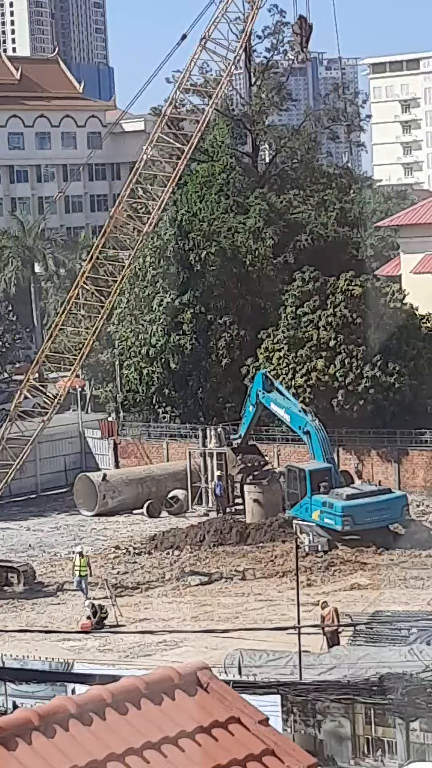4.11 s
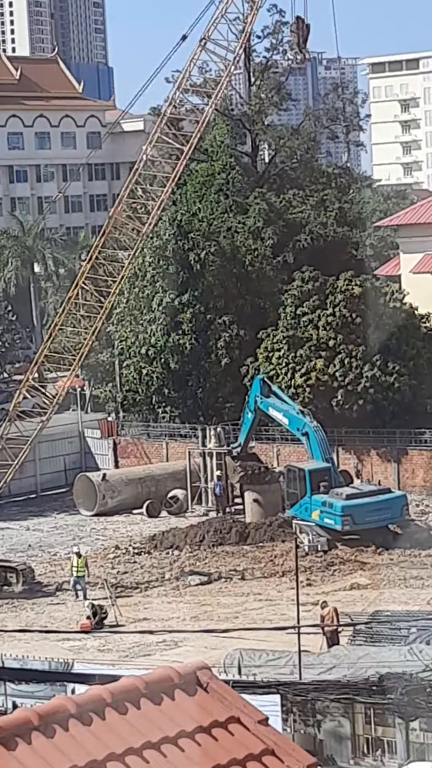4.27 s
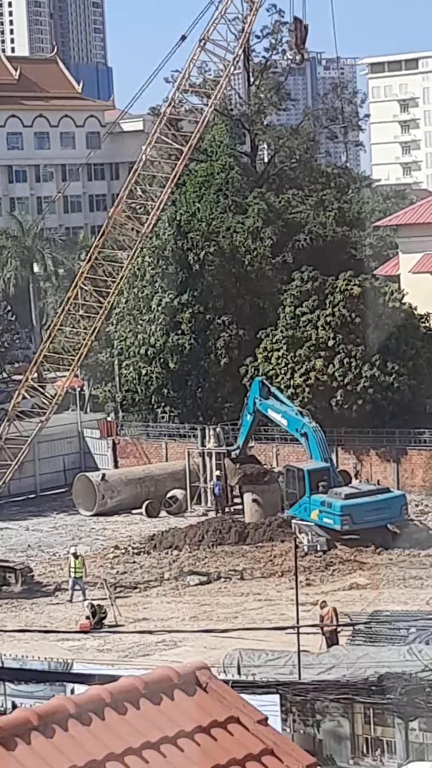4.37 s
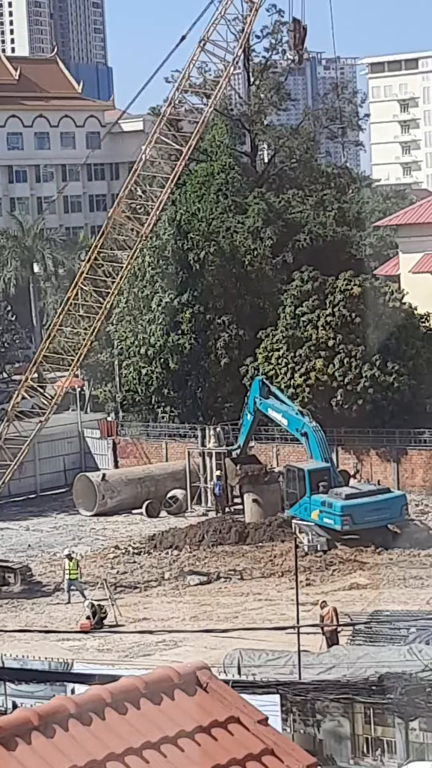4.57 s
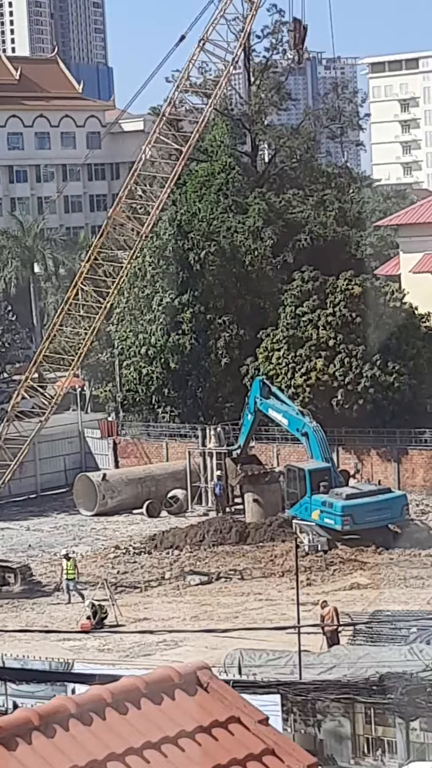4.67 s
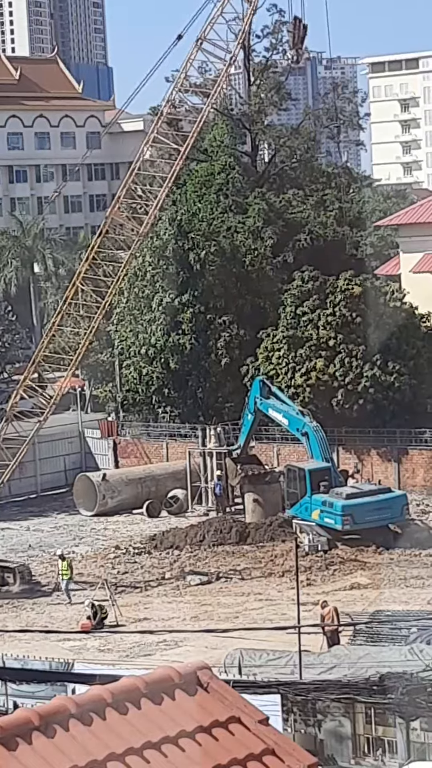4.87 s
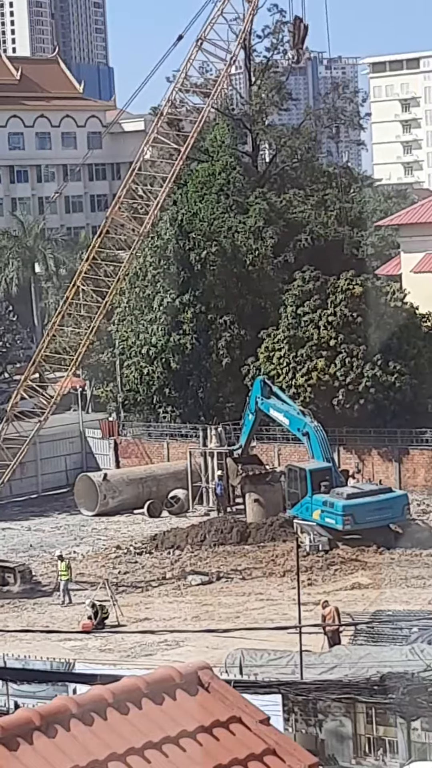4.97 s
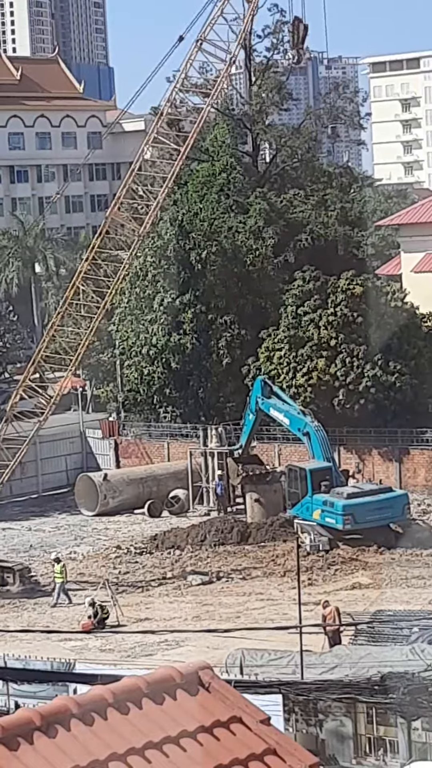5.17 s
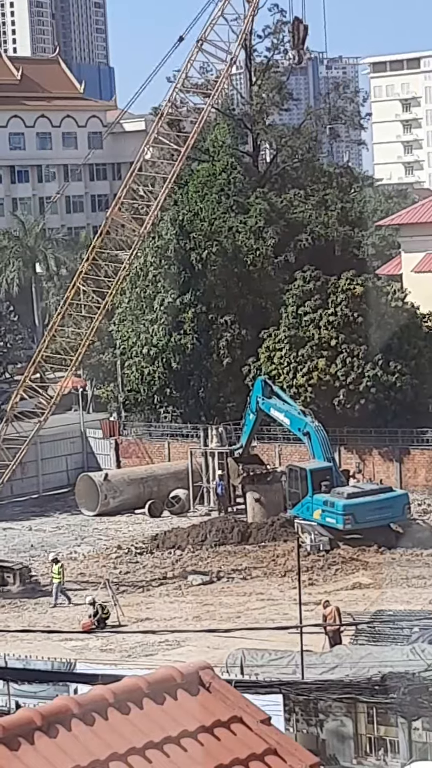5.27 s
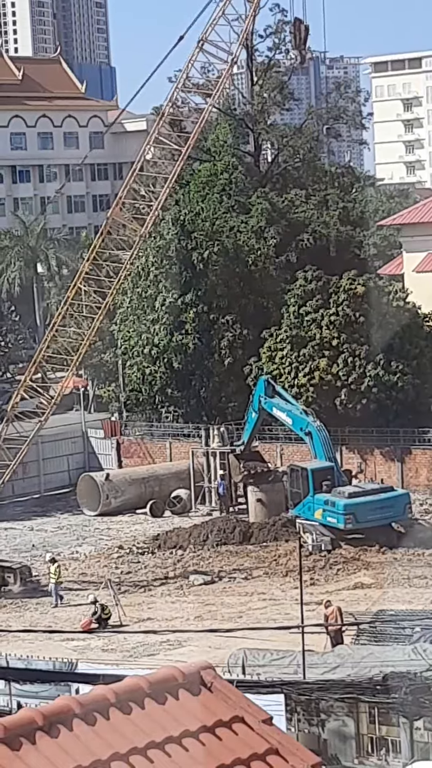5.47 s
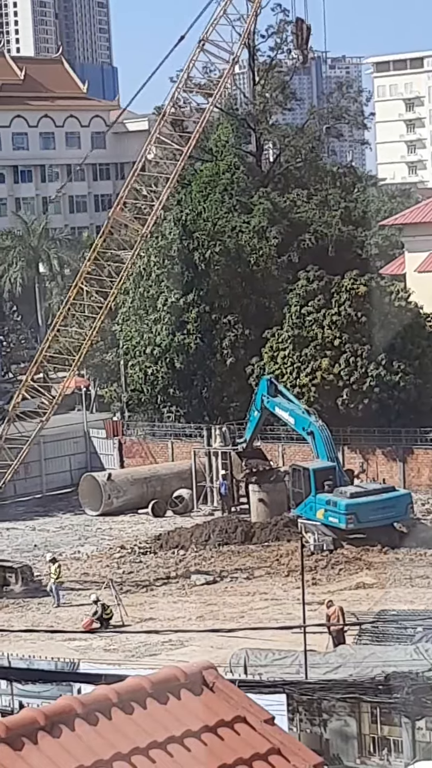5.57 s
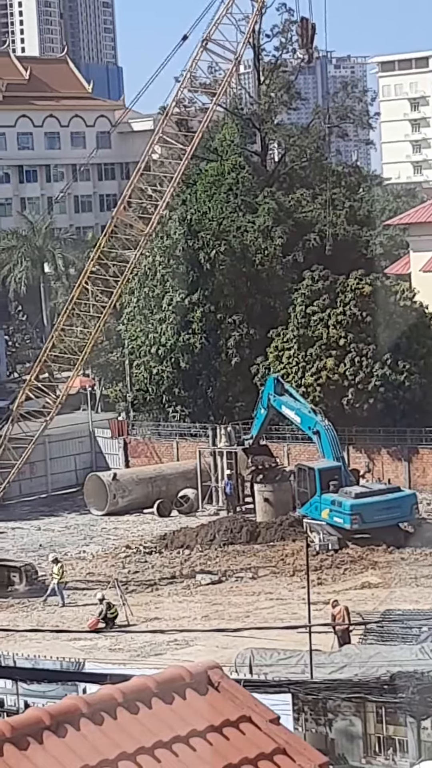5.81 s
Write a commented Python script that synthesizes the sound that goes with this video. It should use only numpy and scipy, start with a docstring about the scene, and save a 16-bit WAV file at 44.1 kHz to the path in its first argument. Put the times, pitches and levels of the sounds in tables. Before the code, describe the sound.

A city building site heard from across a yard, with a handheld stereo microphone. It opens on the decaying tail of an earlier blow, over a low, bass-heavy roar of traffic and machines and a diesel hum pulsing unevenly. A faint, grainy high squeak appears around 0.8-1.1 s. At about 1.2 s a heavy weight hits a hollow steel casing: a deep, softened metallic boom, with rough ringing, quick facade echoes and low clanks until 1.6 s. A low tone then fades to 2.3 s. Small dry rubbing strokes, very close and mostly left, scratch from 1.1 to 1.8 s, with slight traces near 2.3 s. Similar booms land at 2.9 s, with somewhat stronger bass and brighter edges, and 4.6 s, each dying over a second or two. Thin, weak whines drift in and out near 2, 4 and 5.5 s. A small dull clank comes at 5.8 s, near the end.

```python
"""Building site: a heavy weight strikes a steel casing, and each boom returns from the facades and dies away.
The booms are shaped noise and slow beating tones; the steel is ringing modes plus short bursts of clanking.
A diesel engine hums with throbbing tones, thin tones whine and a pair of high tones squeaks.
The city roar is noise with a flickering level. Close by, cloth or skin rubs in short strokes of grainy
noise, mostly against the left microphone port."""
import sys
import numpy as np
from scipy import signal
from scipy.fft import rfft, irfft, next_fast_len
from scipy.io import wavfile

SR = 44100
rng = np.random.default_rng(int(sys.argv[2]) if len(sys.argv) > 2 else 0)


def transcribe(signal):
    """Save signal, clipped to [-1, 1], as a 16-bit WAV file at the path in sys.argv[1]."""
    frames = np.atleast_2d(signal).T
    limited = np.clip(frames, -1, 1)
    pcm = np.round(limited * 32767).astype(np.int16)
    wavfile.write(sys.argv[1], SR, pcm)


N = 257544

# Blows; the first falls before the start, so only its tail is heard:
# t/s, relative level/dB, extra bass level/dB, extra treble level/dB
BLOWS = [(-.53, -18.5, -13, 3), (1.168, -21.5, -11, 3.5), (2.934, -21, -8, 5.5), (4.567, -21, -11.5, 4)]
# Arrivals of one blow, direct and from the facades: delay t/s, relative level/dB, extra treble level/dB
ARRIVALS = [(0, 9, -6), (.014, 5, 0.5), (.027, 6, 1), (0.065, -15, 13), (.105, 2.5, -0.5), (.135, 0.5, -9),
            (.2, -12.5, 1), (.285, -0.5, -4), (.37, -5.5, -3), (0.419, -2.5, -7)]
# Ringing modes of the steel casing: f/Hz, relative level/dB, time to fall by 60 dB t/s
CASING_MODES = [(195.5, -17.5, 1.46), (264.4, -11, 0.26), (286.6, -0.5, 0.084), (323, -11.5, 0.95),
                (330.3, -16, 0.56), (364.5, -17.5, 1.14), (420.3, -21, 0.37), (557, -25.5, 0.67),
                (627, -38, 0.43), (668, -33, 1.2), (702, -39, 0.53), (746, -32, 0.61), (1226, -19, 0.55),
                (1230, -26, 0.21), (1373, -29, 0.57), (1427, -16.5, 0.21), (1643, -24, 0.4),
                (1796, -26.5, 0.16), (1985, -34, 0.34), (2243, -27.5, 0.46), (2550, -44, 1),
                (3115, -34.5, 0.51), (3570, -31, 0.47), (3610, -37, 0.37)]
# Tone colour of the boom noise: f/Hz, relative level per Hz/dB
BOOM_COLOUR = [(24, -28), (40, -20.5), (120, 8), (227, -10.5), (313, -9), (500, -11), (700, -15.5),
               (980, -14), (1230, -17), (1820, -25), (2600, -28), (3600, -36.5), (5000, -42.5),
               (7500, -45.5), (15000, -66.5)]
# How long the scattered sound lasts: f/Hz, time to fall by 60 dB t/s
SITE_DECAY = [(50, 0.9), (130, 3), (350, 1.97), (920, 1.73), (2430, 2.05), (6400, 1.06), (12000, 0.63)]
# Groups of evenly spaced deep modes: lowest f/Hz, spacing f/Hz, time when they are first in step t/s
DEEP_GROUPS = [(55, 4.6, .057), (112.5, 11.8, .03)]
# The same groups: list of each mode's relative level/dB, time to fall by 60 dB t/s
DEEP_LEVELS = [([-13.5, -20], 1.75), ([0, 0.43, -7], 1.13)]
# Loose steel clanking after a blow: time of the peak t/s, level/dB, centre f/Hz
CLANKS = [(1.205, -43, 4100), (1.212, -16.5, 340), (1.385, -21, 313), (1.62, -23, 312), (2.955, -20, 753),
          (2.975, -21, 340), (4.585, -21, 303), (4.603, -35, 3660), (4.77, -47.5, 3673), (4.84, -38, 2325),
          (5.79, -27, 167)]
# Rubbing strokes: centre t/s, half length t/s, level on the left/dB, left minus right level/dB
RUBS = [(1.074, 0.0046, -44, 14.5), (1.135, 0.022, -40.5, 20), (1.269, .01, -43, 20), (1.31, .02, -50, 20),
        (1.467, 0.034, -34, 29), (1.598, 0.014, -37.5, 25), (1.678, 0.025, -34, 34),
        (1.742, 0.044, -38.5, 34), (1.819, 0.025, -36.5, 33), (2.326, 0.0052, -46.5, 1),
        (2.488, .006, -60, 3)]
# Faint swells of hiss with the colour of the rubbing: same columns as the strokes
HISS_SWELLS = [(.7, 0.098, -57, 6), (1.5, 0.29, -60, 17), (2.152, 0.29, -55, 8), (5.4, 0.16, -59, 6)]
# Tone colour of the rubbing: f/Hz, relative level per Hz/dB
RUB_COLOUR = [(500, 11.5), (2500, 2), (5000, -7), (8000, -7), (11500, -3), (14000, -10), (16000, -17)]
# Throbbing of the engine's firing tone: t/s, level/dB
ENGINE_THROB = [(0, -47.5), (.22, -35), (.39, -58), (.55, -44.5), (.85, -38.5), (1.03, -45), (1.2, -34),
                (1.63, -41), (2.05, -53), (2.3, -34.5), (2.61, -44), (2.75, -34), (3.4, -43), (3.52, -34.5),
                (3.72, -48), (3.85, -35), (4.15, -42.5), (4.33, -35), (5.1, -45.5), (5.4, -37), (5.57, -51),
                (5.75, -42)]
# Further engine tones: multiple of the firing frequency, level/dB
ENGINE_ORDERS = [(1.5, -53.5), (3, -62), (4, -45.5), (6, -57.5)]
# Upper whines, each sagging once in pitch: start t/s, end t/s, lowest pitch at t/s, level/dB
UPPER_WHINES = [(.24, .46, .46, -64), (1.9, 2.517, 2.24, -66.5), (3.581, 4.05, 3.85, -68),
                (5.57, 5.84, 5.7, -70)]
# Lower whines, gliding in pitch: start t/s, end t/s, start f/Hz, end f/Hz, level/dB
LOWER_WHINES = [(2.0, 2.85, 3310, 3260, -69.5), (3.7, 4.45, 3240, 3250, -66.5),
                (5.15, 5.84, 3330, 3220, -64.5)]
# Squeaks: start t/s, end t/s, level of each of the two tones at the start/dB
SQUEAKS = [(0.817, 1.1, -60), (2.15, 2.27, -67.5)]
# Coming and going of the roar's bass: t/s, relative level/dB
ROAR_BASS = [(0, 1.5), (.6, -2), (1.1, 3.5), (2.1, 0), (2.8, -1), (3.7, -4), (4.1, -0.5), (4.25, -5),
             (4.5, 0.5), (5.45, -1), (5.7, -4), (5.84, 4.5)]
# Tone colour of the roar: f/Hz, relative level per Hz/dB
ROAR_COLOUR = [(15, -60), (25, -24), (56, -9.5), (70, -7), (110, -0.5), (198, -11.5), (331, -7), (826, -25),
               (1080, -22.5), (1750, -27), (2400, -28.5), (5430, -44.5), (11200, -55), (15500, -76)]
# Narrow hums in the roar: f/Hz, width f/Hz, lift level/dB
HUMS = [(198, 2.7, 5), (1280, 73, 5.5), (1382, 15, 9), (1590, 50, 6.5), (1980, 27, 5), (2260, 41, 5.5),
        (2513, 9.6, 13.5)]
# Resonances where the microphone stands: f/Hz, width f/Hz, lift level/dB
PLACE = [(336, 34, 1), (1212, 37, 5.5), (1295, 111, 6), (6960, 1760, 4.5)]
# Likeness of left and right (1 = the same; below 0 is used as 0): f/Hz, likeness
LIKENESS = [(60, 0.93), (130, 0.95), (290, 0.86), (640, 0.46), (1410, 0.57), (3100, 0.53), (6820, -0.41),
            (15000, -0.02)]
# Balance of the far sounds: f/Hz, left minus right level/dB
LEAN = [(60, 0.1), (110, 0.6), (200, 0), (380, 2), (700, 4), (1290, 2), (2380, 1.5), (4400, -2.5),
        (8120, 3.5), (15000, 4.5)]

T = np.arange(N) / SR  # time of every sample in s
SIZE = next_fast_len(N)
HZ = np.maximum(np.fft.rfftfreq(SIZE, 1 / SR), 1)

ARRIVAL_S = 0.022  # time scale of one arrival, which peaks after half of this
TAIL_DB, TAIL_RISE_S = 5.5, 0.033
BASS_LEAD_S, TREBLE_LAG_S = 0.0073, 0.005  # lows swell first, highs come last
DEEP_SCATTER_DB = -4.5  # deep sound scatters little
RING_WIDTH_HZ, RING_DB = 35, 3  # the scattered sound keeps the pitches of the casing
ECHO_DB = -12.5  # level of the ring in the echoes, added to each arrival's own
CLANK_S, CLANK_OCTAVES = .015, .15  # time scale and bandwidth
STROKE_EDGE = 2.5  # steepness of a stroke's flanks
FIRING_HZ = 83.9
UPPER_HZ, SAG_HZ, SAG_S, WHINE_FADE_S = 3570, 92.2, .17, 0.054
LOW_START_S, LOW_END_S, LOW_HZ, LOW_DB, LOW_LOSS_DB_PER_S = 1.622, 2.3, 155.8, -37.5, 14
SQUEAK_HZ, SQUEAK_LOSS_DB_PER_S, SQUEAK_FADE_S = 8940, 17, 0.028
RIGHT_LAG_S = 4e-5  # the site lies a little to the left
CUTOFF_HZ = 15714


def amp(db):
    """Turn decibels into a gain factor."""
    return 10 ** (np.asarray(db) / 20)


def rms_one(x):
    """Scale to an rms (average strength) of 1."""
    return x / np.sqrt(np.mean(x ** 2) + 1e-20)


def in_time(table):
    """Draw straight lines through a table's columns, giving a value at every sample."""
    s, *columns = np.transpose(table)
    return [np.interp(T, s, c) for c in columns]


def sounding(start_s, end_s, fade_s):
    """Be 1 from start to end and fade in and out just outside."""
    return np.clip(np.minimum(T - start_s, end_s - T) / fade_s + 1, 0, 1)


def at_hz(points, hz):
    """Read a table between its points on a log-frequency axis."""
    points = np.array(points)
    return np.interp(np.log(hz), np.log(points[:, 0]), points[:, 1])


def peaks_db(peaks):
    """Add up bell-shaped lifts of the spectrum in dB."""
    return sum(db / (1 + ((HZ - hz) / (width / 2)) ** 2) for hz, width, db in peaks)


def drift(rate_hz):
    """Wander at random with a spread of 1, smoothed by two low-pass steps at rate_hz."""
    # made at every 40th sample, then joined by straight lines; the first 2000 let the filter settle
    r = np.exp(-80 * np.pi * rate_hz / SR)
    noise = rng.standard_normal(N // 40 + 2002)
    slow = signal.lfilter([1], [1, -2 * r, r * r], noise)[2000:]
    return np.interp(np.arange(N) / 40, np.arange(len(slow)), rms_one(slow))


def filtered(x, gain):
    """Multiply each frequency of a sound by its gain."""
    return irfft(rfft(x, SIZE) * gain, SIZE)[..., :N]


def tone(hz, db, waver_hz, flicker_db):
    """Make a sine wave that wavers in pitch and level."""
    phase = 2 * np.pi * np.cumsum(hz + waver_hz * drift(23.1)) / SR
    return np.sqrt(2) * amp(db + flicker_db * drift(19)) * np.sin(phase)


def diffuse(colour_db, envelope):
    """Make stereo noise from all around, rms 1, in overlapping bands that each follow envelope(centre Hz)."""
    mid, side = rfft(rng.standard_normal((2, SIZE)))
    alike = np.clip(at_hz(LIKENESS, HZ), 0, 1)
    both = np.sqrt(1 + alike) * mid + np.sqrt(1 - alike) * side * [[1], [-1]]
    both = amp(colour_db) * both
    both = both / np.std(irfft(both, SIZE))
    band_place = 1.5 * np.log2(HZ / 30)  # 1.5 bands per octave, from 30 Hz
    out = np.zeros((2, N))
    for k in range(15):
        share = np.clip(1 - abs(band_place - k), 0, 1)
        out += envelope(30 * 2 ** (k / 1.5)) * irfft(both * share, SIZE)[:, :N]
    return out


def boom_envelope(hz):
    """Each arrival is a short swell; under them the scattered sound builds up and decays."""
    bright = np.clip(np.log2(hz / 1000) / 2, 0, 1)
    deep = np.clip(np.log2(250 / hz), 0, 1)
    after = np.arange(2000) / 1000  # the first 2 s after a blow
    # levels are doubled because powers, not amplitudes, are added
    shape = amp(2 * TAIL_DB) * (1 - np.exp(-after / TAIL_RISE_S))
    shape *= amp(-2 * 60 * after / at_hz(SITE_DECAY, hz))
    for delay, db, treble_db in ARRIVALS:
        age = np.clip(after - delay, 0, None) / ARRIVAL_S
        shape += amp(2 * (db + bright * treble_db)) * 2 * age * np.exp(-2 * age)
    lag_s = TREBLE_LAG_S * bright - BASS_LEAD_S * np.clip(np.log2(1000 / hz) / 2, 0, 1)
    power = np.zeros(N)
    for s, db, bass_db, treble_db in BLOWS:
        strength = amp(2 * (db + deep * bass_db + bright * treble_db))
        power += strength * np.interp(T - s - lag_s, after, shape, 0, 0)
    # uneven walls make the tail lumpy
    lumps_db = 1.7 * drift(25) + DEEP_SCATTER_DB * deep
    return np.sqrt(power) * amp(lumps_db)


def boom():
    """The scattered sound of the blows is noise, lifted at the pitches of the casing."""
    rings = [(hz, RING_WIDTH_HZ, RING_DB) for hz, db, t60 in CASING_MODES]
    return diffuse(at_hz(BOOM_COLOUR, HZ) + peaks_db(rings), boom_envelope)


def deep_boom():
    """Evenly spaced deep modes drift in and out of step, so they beat in slow thumps."""
    out, age = np.zeros(N), np.arange(SR) / SR  # each thump lasts 1 s
    for (low_hz, step_hz, peak_s), (levels_db, t60) in zip(DEEP_GROUPS, DEEP_LEVELS):
        swell = np.sin(np.pi / 2 * np.clip(age / peak_s, 0, 1)) ** 2
        swell *= amp(-60 * age / t60)
        group = sum(amp(db) * np.cos(2 * np.pi * (low_hz + k * step_hz) * (age - peak_s))
                    for k, db in enumerate(levels_db))
        for s, db, bass_db, treble_db in BLOWS[1:]:
            at = round(s * SR)
            out[at:at + SR] += amp(db + bass_db + 11.5) * swell * group
    return out


def casing():
    """The blow sets the steel's modes ringing, with a new strength each time."""
    ring, lead = np.zeros(N), SR  # 1 s of lead holds the blow before the start
    luck_db = rng.standard_normal((len(BLOWS), len(CASING_MODES)))
    # the force builds, so the ring swells instead of clicking
    swell, strength_db = np.hanning(round(.03 * SR)), 8
    for k, (hz, mode_db, t60) in enumerate(CASING_MODES):
        w = 2 * np.pi * hz / SR
        drive = np.zeros(N + SR)
        push = swell * np.cos(w * np.arange(len(swell))) * 2 / swell.sum()
        for (s, db, bass_db, treble_db), chance_db in zip(BLOWS, luck_db[:, k]):
            at = round(s * SR) + lead
            drive[at:at + len(push)] += push * amp(db + mode_db + strength_db + chance_db)
        r = amp(-60 / (t60 * SR))
        # a resonant filter; the tiny offset keeps its numbers from getting too small
        mode = signal.lfilter([0, np.sin(w)], [1, -2 * r * np.cos(w), r * r], drive + 1e-18)[lead:]
        # loose parts and many paths break the ring into rough pieces
        ring += mode * (1 + .8 * drift(40))
    # the ring reaches the two ports by slightly different echoes
    echoes = np.zeros((2, N))
    for channel in range(2):
        for delay, db, treble_db in ARRIVALS[1:]:
            shift = round((delay + rng.uniform(0, 0.00055)) * SR)
            echoes[channel] += amp(ECHO_DB + db) * np.roll(ring, shift)  # the end wraps to the start
    return ring + echoes


def clanks():
    """Loose steel gives short bursts of narrow noise, each around its own pitch."""
    length = round(.15 * SR)
    age, out = np.arange(length) / SR / CLANK_S, np.zeros((2, N + length))
    burst = np.sqrt(2 * age * np.exp(1 - 2 * age))
    noises = rng.standard_normal((len(CLANKS), 2, length))
    for (s, db, hz), noise in zip(CLANKS, noises):
        edges = hz * 2 ** (CLANK_OCTAVES / 2 * np.array([-1, 1]))
        band_filter = signal.butter(2, edges, "band", fs=SR, output="sos")
        # higher clanks differ more between left and right
        stereo = noise[0] + noise * np.clip(hz / 2500, 0, 1)
        band = signal.sosfilt(band_filter, stereo)
        at = round((s - CLANK_S / 2) * SR)
        out[:, at:at + length] += amp(db) * rms_one(band) * burst
    return out[:, :N]


def rubs():
    """Friction is grainy noise under bell-shaped strokes, different in each port; hiss swells share it."""
    grain = rng.standard_normal((2, N)) * amp(1.5 * rng.standard_normal((2, N)))
    hiss = rms_one(filtered(grain, amp(at_hz(RUB_COLOUR, HZ)) * (HZ > 300)))
    strokes = np.zeros((2, N))
    for s, half_s, db, lean_db in RUBS + HISS_SWELLS:
        bell = np.exp(-abs((T - s) / half_s) ** STROKE_EDGE)
        strokes += amp([[db], [db - lean_db]]) * bell
    return hiss * strokes


def engine():
    """The firing tone throbs; a few of its multiples stand out of the roar."""
    throb_db, = in_time(ENGINE_THROB)
    firing = tone(FIRING_HZ, throb_db, 1.0, 0.98)
    return firing + sum(tone(k * FIRING_HZ, db, 4.7, 1.24) for k, db in ENGINE_ORDERS)


def whines():
    """Thin sines come and go, sagging or gliding; one low tone comes quickly and fades slowly."""
    out = np.zeros(N)
    for start, end, lowest_s, db in UPPER_WHINES:
        hz = UPPER_HZ - SAG_HZ * np.exp(-((T - lowest_s) / SAG_S) ** 2)
        out += sounding(start, end, WHINE_FADE_S) * tone(hz, db, 10, 2.5)
    for start, end, start_hz, end_hz, db in LOWER_WHINES:
        hz = np.interp(T, [start, end], [start_hz, end_hz])
        out += sounding(start, end, WHINE_FADE_S) * tone(hz, db, 10, 2.5)
    low_db = LOW_DB - LOW_LOSS_DB_PER_S * (T - LOW_START_S)
    return out + sounding(LOW_START_S, LOW_END_S, .1) * tone(LOW_HZ, low_db, 3, 2)


def squeak():
    """Two fluttering high tones either side of a centre pitch make a grainy squeak that weakens."""
    flutter_db = 3 * drift(70)
    pair = tone(SQUEAK_HZ + 90, flutter_db, 40, 2) + tone(SQUEAK_HZ - 90, flutter_db, 40, 2)
    level = np.zeros(N)
    for start, end, db in SQUEAKS:
        level += sounding(start, end, SQUEAK_FADE_S) * amp(db - SQUEAK_LOSS_DB_PER_S * (T - start))
    return pair * level


def roar():
    """Far traffic and machines are noise whose bands each flicker a little; the bass comes and goes."""
    bass_db, = in_time(ROAR_BASS)
    total_db, flicker_db = -36.5, .9

    def envelope(hz):
        """Full bass movement up to 150 Hz, none above 900 Hz."""
        deep = np.clip(np.log(900 / hz) / np.log(6), 0, 1)
        return amp(deep * bass_db + total_db + flicker_db * drift(6.8))
    return diffuse(at_hz(ROAR_COLOUR, HZ) + peaks_db(HUMS), envelope)


def scene():
    """Everything far passes through the resonances of the listening place; the rubbing does not."""
    far = boom() + deep_boom() + casing() + clanks() + engine() + whines() + squeak() + roar()
    lean_db = at_hz(LEAN, HZ) / 2 * np.array([[1], [-1]])
    # a turn of phase delays the right side only
    lag = np.exp(-2j * np.pi * HZ * RIGHT_LAG_S * np.array([[0], [1]]))
    return filtered(far, amp(peaks_db(PLACE) + lean_db) * lag) + rubs()


def record(dry):
    """A steep low-pass filter cuts the top of the range."""
    low_pass = signal.ellip(12, .5, 70, CUTOFF_HZ, fs=SR, output="sos")
    return signal.sosfilt(low_pass, dry)


dry = scene()
out = record(dry)
transcribe(out)
```